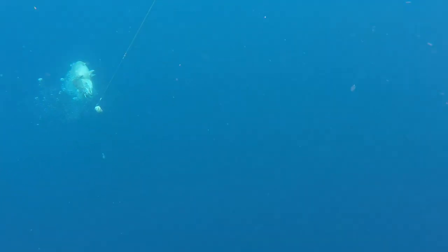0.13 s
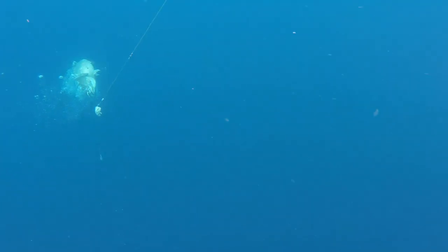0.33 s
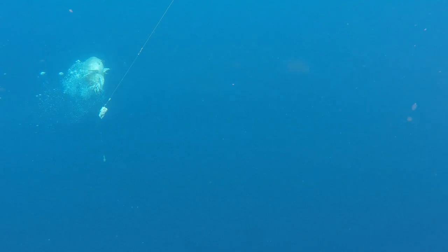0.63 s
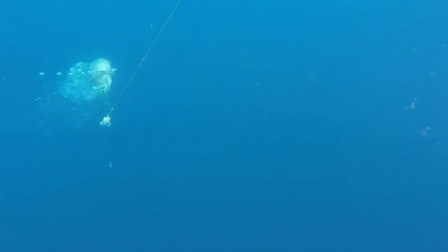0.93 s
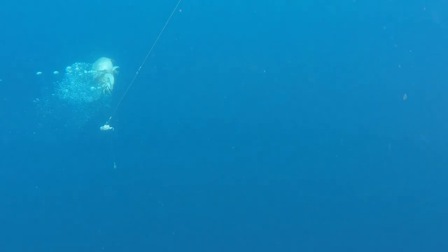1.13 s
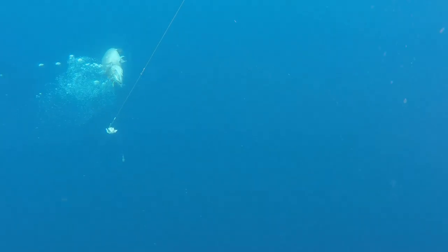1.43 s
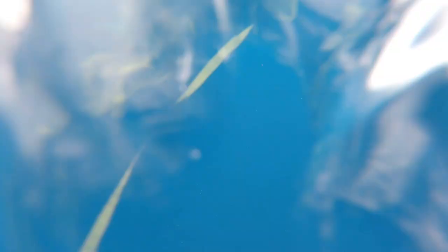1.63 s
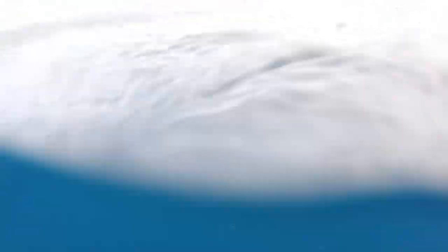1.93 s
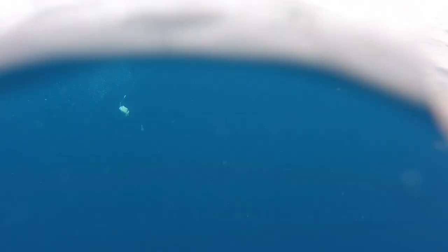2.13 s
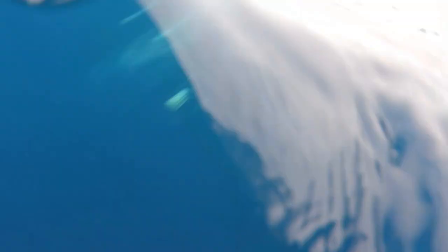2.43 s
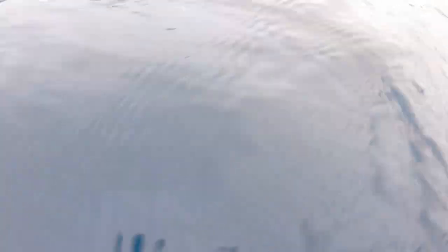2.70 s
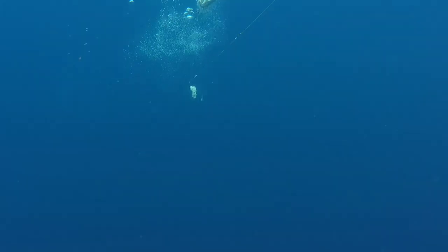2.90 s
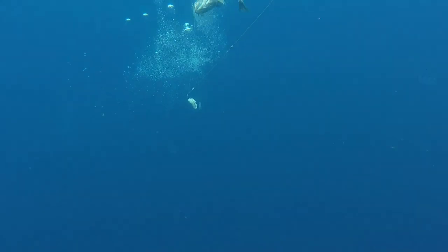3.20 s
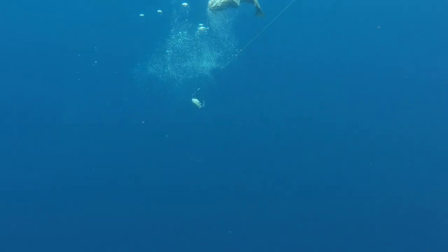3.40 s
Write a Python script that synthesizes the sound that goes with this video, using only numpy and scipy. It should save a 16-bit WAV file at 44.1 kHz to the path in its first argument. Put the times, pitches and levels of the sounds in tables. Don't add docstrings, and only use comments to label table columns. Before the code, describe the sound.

Inside a sealed camera housing at sea, dull watery rumble and rapid hollow bubbling come first, then knocks, thin water wash and ticking drops at the surface, a final dense plunge, and sudden quiet.

```python
import sys
import numpy as np
from scipy import signal
from scipy.fft import rfft, irfft, next_fast_len
from scipy.io import wavfile

SR = 44100
rng = np.random.default_rng(int(sys.argv[2]) if len(sys.argv) > 2 else 0)


def to_wav(sig):
    pcm = np.clip(np.atleast_2d(sig), -1, 1) * 32767
    pcm = np.round(pcm).astype(np.int16)
    wavfile.write(sys.argv[1], SR, pcm.T)


def invert_db(level):
    return 10 ** (np.asarray(level, dtype=float) / 20)


N = 156555


def in_time(rows, axis=1):
    table = np.array(rows)
    return np.interp(np.arange(N) / SR, table[:, 0], table[:, axis])


def rms_one(x):
    return x / np.sqrt(np.mean(x ** 2) + 1e-20)


def colour(x, spectrum, peaks=()):
    size = next_fast_len(N + SR)
    hz = np.maximum(np.fft.rfftfreq(size, 1 / SR), 1)
    closed = [(1, spectrum[0][1] - 60)] + list(spectrum) + [(SR, spectrum[-1][1] - 40)]
    table_hz, table_db = np.transpose(closed)
    db = np.interp(np.log(hz), np.log(table_hz), table_db)
    for centre_hz, width_hz, top_db in peaks:
        db = db + top_db / (1 + (2 * (hz - centre_hz) / width_hz) ** 2)
    cepstrum = irfft(db * np.log(10) / 20, size)
    cepstrum[1:size // 2] *= 2
    cepstrum[size // 2 + 1:] = 0
    return irfft(rfft(x, size) * np.exp(rfft(cepstrum)), size)[:N]


def resonate(x, hz, width_hz):
    r = np.exp(-np.pi * width_hz / SR)
    feedback = [1, -2 * r * np.cos(2 * np.pi * hz / SR), r * r]
    return signal.lfilter([(1 - r * r) / 2, 0, (r * r - 1) / 2], feedback, x)


def lowpass(x, order, hz):
    return signal.sosfilt(signal.butter(order, hz, fs=SR, output="sos"), x)


def drift(rate_hz):
    r = np.exp(-2 * np.pi * rate_hz / SR)
    noise = rng.standard_normal(N + SR)
    return rms_one(signal.lfilter([1], [1, -2 * r, r * r], noise)[SR:])


def grains(per_s, spread_db):
    size = invert_db(spread_db * np.minimum(rng.exponential(1, N), 5)) * rng.choice([-1, 1], N)
    return rms_one(size * (rng.random(N) < per_s / SR))


def puffs(rows, t60_s, width):
    out, t = np.zeros(N + SR), np.arange(SR // 20) / SR
    for s, db, hz in rows:
        puff = rng.standard_normal(len(t)) * invert_db(-60 * t / t60_s)
        tick = resonate(resonate(puff, hz, width * hz), hz, width * hz)
        start = int(s * SR)
        out[start:start + len(t)] += invert_db(db) * tick / np.abs(tick).max()
    return out[:N]


def sinking(rows, width_hz):
    carrier = np.cos(2 * np.pi * np.cumsum(in_time(rows)) / SR)
    t = np.arange(N) / SR
    inside = (t > rows[0][0]) & (t < rows[-1][0])
    level = invert_db(in_time(rows, axis=2) + 2.2 * drift(64))
    return inside * level * drift(width_hz) * carrier


def damped_tones(rows, rise_per_cycle):
    out, t = np.zeros(N + SR), np.arange(SR // 2) / SR
    for s, db, hz, t60, attack in rows:
        cycles = hz * t * (1 + rise_per_cycle * hz * t / 2)
        swell = np.sin(np.pi / 2 * np.minimum(t / attack, 1)) ** 2
        decay = invert_db(-60 * np.maximum(t - attack, 0) / t60)
        start = int(s * SR)
        out[start:start + len(t)] += invert_db(db) * swell * decay * np.sin(2 * np.pi * cycles)
    return out[:N] * invert_db(2.5 * drift(60))


# [f/Hz, level/dB per Hz]
STILL_COLOUR = [(250, -18.5), (500, 4.5), (700, -1), (1250, -7.5), (1600, -14), (2000, -45)]


def still_water():
    still = rms_one(colour(grains(1700, spread_db=4.5), STILL_COLOUR))
    fade_db = np.minimum(in_time(TRICKLE_LEVEL) + 70, 0)
    return invert_db(-69.5 + fade_db + 2.5 * drift(9.0)) * still


def air_space():
    hz, width_hz = 715, 100
    air = resonate(resonate(rng.standard_normal(N), hz, width_hz), hz, width_hz)
    return invert_db(-64 + 1.4 * drift(5.0)) * rms_one(air)


# [t/s, level/dB]
DRONE_LEVEL = [(0, -31), (.85, -39), (1.27, -27.5), (1.95, -25.5), (2.3, -31.5), (2.9, -26.5),
               (2.99, -46.5), (3.15, -42.5), (3.3, -52.5)]


def hull_drone():
    hz = 72.8 * (1 + 0.012 * drift(7.3))
    phase = 2 * np.pi * np.cumsum(hz) / SR
    return invert_db(in_time(DRONE_LEVEL) + 1.5 + 0.53 * drift(36.0)) * -np.cos(phase)


# [t/s, level/dB]
FLOW_LEVEL = [(0, -29.5), (.09, -36.5), (.3, -34.5), (.85, -33), (1.15, -25.5), (1.45, -24), (1.7, -29),
              (2.27, -27), (2.3, -36.5), (2.36, -25.5), (2.8, -25.5), (2.94, -18.5), (2.99, -44),
              (3.2, -46), (3.27, -57.5), (3.55, -53.5)]
# [f/Hz, width/Hz, level/dB]
MOUNT_MODES = [(33.8, 7, 2), (68, 33, -2), (107.9, 3, -11.5), (130, 17, -6.5), (147.4, 14, -16)]
# [f/Hz, level/dB per Hz]
TURBULENCE_COLOUR = [(12, -49), (20, 5.5), (75, -0.5), (134, -4.5), (226, -23.5), (300, -24), (343, -24.5),
                     (700, -32.5), (910, -67), (1540, -120)]
# [t/s, share lost/0-1]
SURFACED_SHARE = [(1.65, 0), (1.8, 0.95), (2.6, 0.9), (2.72, 1)]


def flow_rumble():
    lumpy_db, modes = 3, 0
    for hz, width_hz, db in MOUNT_MODES:
        mode = rms_one(resonate(rng.standard_normal(N), hz, width_hz))
        modes = modes + invert_db(db + lumpy_db * drift(5.4)) * mode
    modes = lowpass(modes, 4, 282.5)
    lumps = rng.standard_normal(N) * invert_db(lumpy_db * drift(2.4))
    push = rms_one(colour(lumps, TURBULENCE_COLOUR))
    shake = rms_one(modes + invert_db(0.5) * push)
    deep = signal.sosfiltfilt(signal.butter(3, 43, fs=SR, output="sos"), shake)
    return invert_db(in_time(FLOW_LEVEL)) * (shake - in_time(SURFACED_SHARE) * deep)


def gurgles():
    per_s, low_hz, high_hz, cycles = 50, 88, 510, 7.96
    out, flow_db = np.zeros(N + SR), in_time(FLOW_LEVEL)
    for when, pitch, swoop, size in rng.random((per_s * N // SR, 4)):
        hz = low_hz * (high_hz / low_hz) ** pitch
        start = int(when * (N - 1))
        length = cycles / hz * SR
        u = np.arange(int(length)) / length
        end = start + len(u)
        tone = np.sin(2 * np.pi * cycles * u * (1 + 0.29 * (swoop - 0.3) * u))
        swell = np.sin(np.pi * u ** 0.63) ** 2
        db = flow_db[min(end, N - 1)] - 4.5 + 11.4 * size - 22 * pitch
        out[start:end] += invert_db(db) * tone * swell
    return out[:N]


# [t/s, f/Hz, level/dB]
SEAM_SEEP = [(2.40, 4220, -81), (2.47, 4350, -78.5), (2.57, 4110, -74), (2.60, 3650, -70.5),
             (2.68, 3480, -79), (2.72, 3600, -90)]


def seeping_seam():
    return sinking(SEAM_SEEP, width_hz=260)


# [t/s, f/Hz, level/dB]
PORT_FILL = [(2.795, 5400, -84), (2.815, 5327, -54), (2.85, 5060, -56.5), (2.862, 4710, -42.5),
             (2.895, 4400, -54.5), (2.905, 3900, -49), (2.918, 3460, -84)]


def filling_port():
    return sinking(PORT_FILL, width_hz=240)


# [t/s, level/dB, f/Hz, t60/s, attack/s]
HUM_AND_SQUEAK = [
    (1.56, -49.5, 770, 0.79, .06),
    (0.744, -69.5, 3090, 0.12, 0.035),
]


def hum_and_squeak():
    return damped_tones(HUM_AND_SQUEAK, rise_per_cycle=0)


# [t/s, level/dB]
GRIT_FLECKS = [(0.1112, -82), (0.1815, -66), (0.2663, -76), (0.3152, -70), (0.4235, -68), (0.4664, -68),
               (0.4878, -68.5), (0.5267, -69.5), (0.6008, -65.5), (0.822, -70), (0.8884, -73),
               (0.9295, -73.5), (1.0063, -66.5), (1.0552, -61.5), (1.0942, -70), (1.1803, -68),
               (1.273, -70), (1.287, -66), (1.3199, -65)]


def flecks():
    return puffs([(s, db - 0.5, 3900) for s, db in GRIT_FLECKS], t60_s=0.017, width=0.3)


# [t/s, level/dB]
WASH_LEVEL = [(0, -71), (1.55, -65.5), (1.72, -65.5), (1.9, -55), (2.24, -56.5), (2.29, -66.5), (2.36, -58),
              (2.55, -60.5), (2.78, -52), (2.94, -49), (2.97, -105), (3.55, -89.5)]
# [f/Hz, level/dB per Hz]
RUNOFF_COLOUR = [(500, -9), (900, -0.5), (2200, -8.5), (2700, -24), (4000, -30), (5000, -39), (8000, -33.5),
                 (12000, -53.5)]
# [t/s, f/Hz, level/dB over the wash]
PORT_DRAIN = [(1.6, 1350, -1), (1.72, 1550, 4), (2.25, 1899, 1.5), (2.3, 2900, -9), (2.8, 1900, -11)]


def wash():
    spray = rms_one(colour(grains(9000, spread_db=1.6), RUNOFF_COLOUR))
    low = resonate(spray, 1000, 1200)
    high = spray - low
    carrier = np.cos(2 * np.pi * np.cumsum(in_time(PORT_DRAIN)) / SR)
    port = invert_db(in_time(PORT_DRAIN, axis=2)) * drift(240) * carrier
    flicker = low * invert_db(-0.5 + 3.7 * drift(21.0)) + high * invert_db(2.4 * drift(54))
    return invert_db(in_time(WASH_LEVEL) + 4.0) * (flicker + port)


# [t/s, level/dB, f/Hz]
DROP_TICKS = [(1.3274, -52, 6270), (1.3967, -50, 3900), (1.9495, -51, 3740), (1.9845, -32, 4080),
              (1.9884, -36.5, 3600), (2.2667, -46, 3880), (2.2707, -45, 4650), (2.4149, -44, 6500),
              (2.7888, -43.5, 3900), (2.7955, -35, 4800), (2.8052, -40.5, 5450), (2.815, -39, 6240),
              (2.8278, -33.5, 4930), (2.8331, -37.5, 5660), (2.8501, -48, 4280), (2.9199, -53, 6500),
              (2.9307, -54, 6500)]


def drops():
    return invert_db(-2) * puffs(DROP_TICKS, t60_s=0.017, width=0.55)


# [t/s, level/dB]
FILM_SNAPS = [(2.652, -62.5), (2.7207, -54), (2.7477, -49.5), (2.7866, -60), (2.7985, -46), (2.8767, -43.5),
              (2.921, -41), (2.9315, -42), (2.9425, -50.5)]


def snaps():
    return puffs([(s, db, 4000) for s, db in FILM_SNAPS], t60_s=0.005, width=1.3)


# [t/s, length/s, dull level/dB, bright level/dB, bright top f/Hz]
WATER_SLAPS = [
    (2.241, 0.037, -26.5, -76.5, 3830),
    (2.413, 0.0181, -46, -59.5, 7000),
    (2.793, 0.047, -40, -70.5, 7980),
    (2.842, 0.024, -49, -40.5, 4270),
    (2.879, 0.04, -27.5, -46.5, 4360),
    (2.916, 0.0332, -32, -70, 8570),
]
# [f/Hz, level/dB per Hz]
SLAP_COLOUR = [(88, -40), (150, 4), (530, 1.5), (1000, -13.5), (2200, -19), (3000, -32), (6000, -69)]


def slaps():
    t, out, per_s, edge_s = np.arange(N) / SR, 0, 1400, 0.004
    body = rms_one(colour(grains(per_s, spread_db=0.5), SLAP_COLOUR))
    fine = grains(3 * per_s, spread_db=3.0)
    for s, length, dull_db, bright_db, top_hz in WATER_SLAPS:
        gate = np.clip(np.minimum(t - s, s + length - t) / edge_s, 0, 1) ** 2
        build = invert_db(8 * (np.clip((t - s) / length, 0, 1) - 0.11))
        band = signal.butter(5, [0.37 * top_hz, top_hz], "band", fs=SR, output="sos")
        spray = signal.sosfilt(band, fine * gate + 1e-18)
        out = out + invert_db(dull_db) * gate * build * body + invert_db(bright_db + 7.0) * spray
    return out


# [t/s, level/dB, f/Hz, t60/s, attack/s]
AIR_POCKETS = [(1.037, -26.5, 278, 0.12, 0.01), (1.303, -51.5, 2730, 0.045, 0.0031),
               (1.306, -17, 630, 0.012, .012), (1.327, -23.5, 379, 0.046, 0.004),
               (1.337, -21.5, 750, 0.034, 0.0052), (1.341, -54.5, 2720, 0.02, 0.0018),
               (1.35, -58, 2800, 0.056, .002), (1.33, -20, 1245, 0.041, 0.00088),
               (1.394, -23, 950, 0.012, 0.0027), (1.432, -27, 1106, 0.12, 0.0014),
               (0.916, -27, 146.4, .25, .05), (1.675, -38.5, 392, 0.21, 0.024),
               (1.998, -29.5, 1080, 0.018, 0.00099), (2.07, -15, 130, 0.066, 0.016),
               (2.091, -29.5, 920, 0.03, 0.0085), (2.093, -29, 1940, .045, 0.011),
               (2.247, -29.5, 974, 0.036, 0.0044), (2.257, -20, 1234, 0.009, 0.0024),
               (2.264, -28, 875, 0.038, 0.0018), (2.708, -33, 595, 0.025, 0.0013),
               (2.788, -41, 3200, .025, 0.0016), (2.815, -24.5, 5270, 0.013, 0.00073),
               (2.828, -43, 1500, 0.015, .0015), (2.867, -35.5, 2100, .025, 0.0019),
               (2.901, -38.5, 3610, 0.02, 0.001), (2.918, -28, 1880, 0.011, 0.00072),
               (2.436, -21.5, 163, 0.18, 0.0039), (2.811, -25, 1830, 0.012, 0.00018),
               (2.853, -21, 1370, 0.0079, 0.0016), (2.907, -26.5, 805, 0.044, 0.0045),
               (2.919, -17, 849.6, 0.051, 0.003), (2.929, -16, 780, 0.018, 0.0046),
               (2.941, -22, 700, 0.069, 0.00052), (2.952, -28, 528, 0.092, 0.0022),
               (3.041, -52.5, 1364, 0.014, 0.0024), (3.049, -30, 117.4, 0.42, 0.022),
               (3.063, -46.5, 520, 0.052, .002), (3.152, -32, 830, 0.095, 0.0022)]


def pockets():
    return damped_tones(AIR_POCKETS, rise_per_cycle=0.001)


# [t/s, level/dB]
TRICKLE_LEVEL = [(0, -53), (.19, -42), (.4, -33.5), (.8, -34.5), (1.25, -32.5), (1.36, -39), (1.52, -43.5),
                 (1.6, -49.5), (1.85, -54), (2.42, -75.5), (2.9, -47), (2.97, -65), (3.02, -90.5),
                 (3.14, -75), (3.22, -69.5), (3.55, -67.5)]
# [f/Hz, level/dB per Hz]
SUBMERGED_COLOUR = [(180, -29.5), (300, -11.5), (600, -4), (1200, -6), (1550, -25), (2050, -34.5),
                    (2350, -51), (3100, -49.5), (4900, -71), (7000, -60), (12000, -66)]
# [f/Hz, width/Hz, level/dB]
CAVITY_PEAKS = [(775, 140, 9), (899.8, 8.3, 9.5), (1075, 380, 5.5), (1940, 340, 6), (2800, 340, 8.5)]
# [t/s, level/dB]
BUBBLE_CLUMPS = [(0.042, -29.5), (0.089, -37.5), (0.117, -22.5), (0.157, -36), (0.185, -23), (0.213, -25.5),
                 (0.259, -24.5), (0.288, -21), (0.322, -27.5), (0.372, -41.5), (0.399, -31), (0.424, -21),
                 (0.457, -18), (0.497, -18), (0.606, -17), (0.672, -21.5), (0.704, -30.5), (0.787, -20.5),
                 (0.813, -25.5), (0.834, -25), (0.868, -34.5), (0.888, -22.5), (0.931, -21), (0.948, -16.5),
                 (1.031, -16), (1.056, -17), (1.111, -20.5), (1.179, -19), (1.227, -37), (1.271, -19),
                 (1.314, -19)]


def trickle():
    clicks = grains(750, spread_db=0.5)
    scale = np.std(colour(clicks, SUBMERGED_COLOUR, CAVITY_PEAKS))
    t, clumps, t60_s, attack_s = np.arange(N) / SR, 0, 0.052, 0.00082
    for s, db in BUBBLE_CLUMPS:
        clicks[int((s + attack_s) * SR)] = 6.0
        age = np.maximum(t - s, 0)
        clumps = clumps + invert_db(db - 13 - 60 * age / t60_s) * np.minimum(age / attack_s, 1)
    steady = invert_db(in_time(TRICKLE_LEVEL) + 1.7 * drift(42))
    return colour(clicks * (steady + clumps), SUBMERGED_COLOUR, CAVITY_PEAKS) / scale


def scene():
    wet = still_water() + air_space() + hull_drone() + flow_rumble() + gurgles()
    wet = wet + seeping_seam() + filling_port() + hum_and_squeak() + flecks()
    wet = wet + wash() + drops() + snaps() + slaps() + pockets() + trickle()
    hiss = invert_db(-99) * rng.standard_normal(N)
    return (lowpass(wet, 3, 11100) + hiss)[None]


def top_cut(x):
    return signal.sosfilt(signal.butter(12, 15100, fs=SR, output="sos"), x)


def record(dry):
    limit = 0.35
    soft = limit * np.tanh(dry / limit)
    return top_cut(soft)


dry = scene()
out = record(dry)
to_wav(out)
```